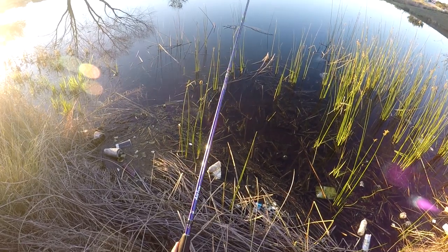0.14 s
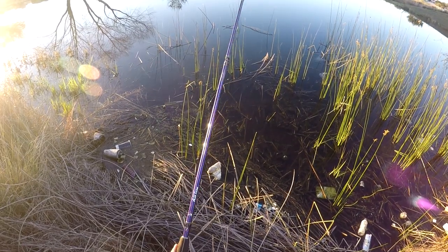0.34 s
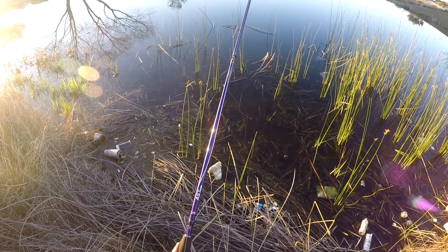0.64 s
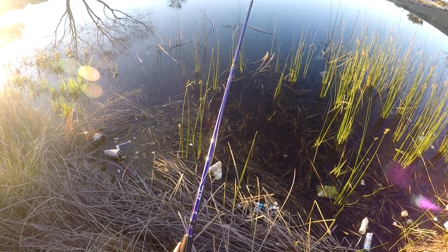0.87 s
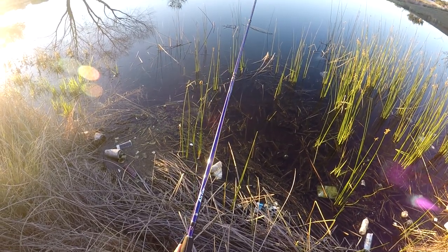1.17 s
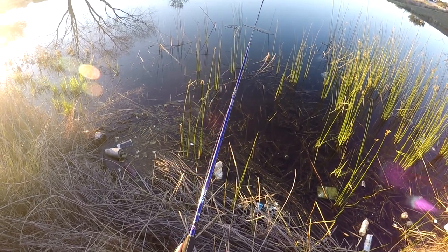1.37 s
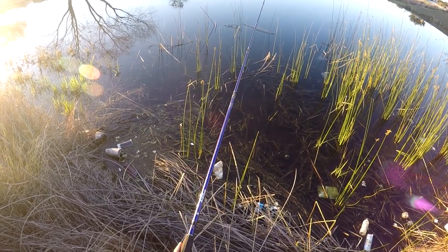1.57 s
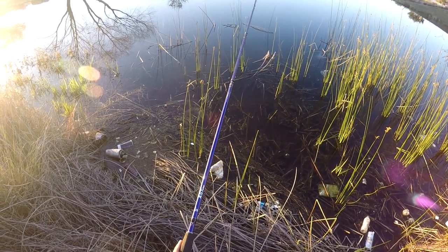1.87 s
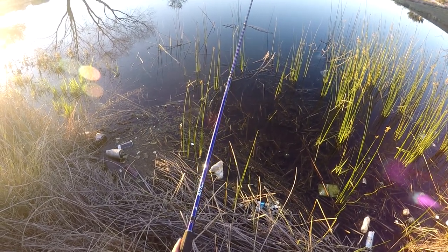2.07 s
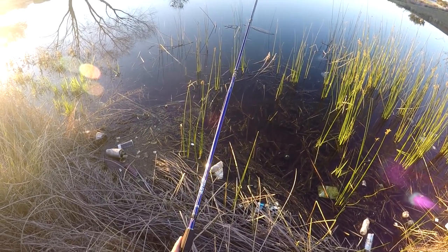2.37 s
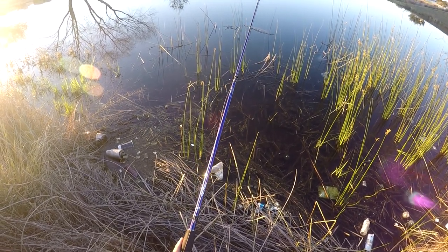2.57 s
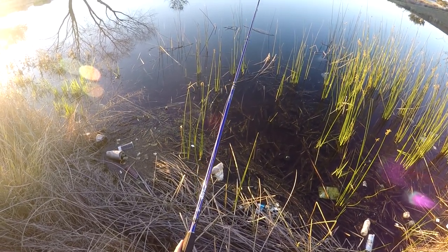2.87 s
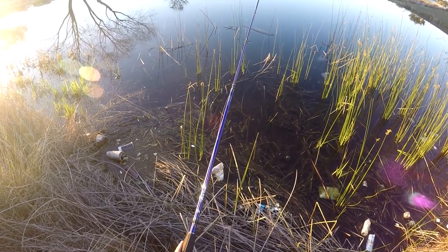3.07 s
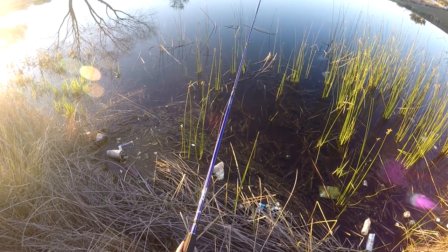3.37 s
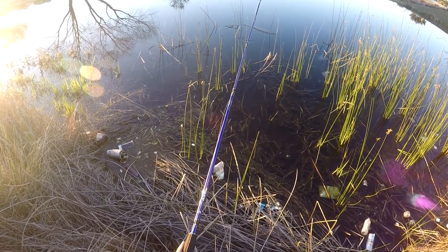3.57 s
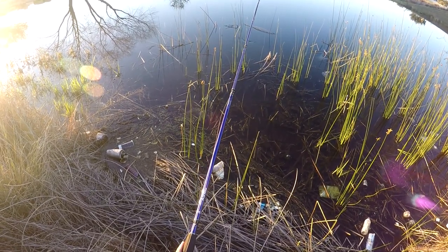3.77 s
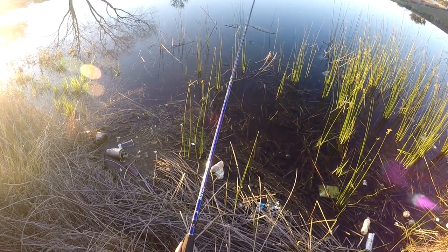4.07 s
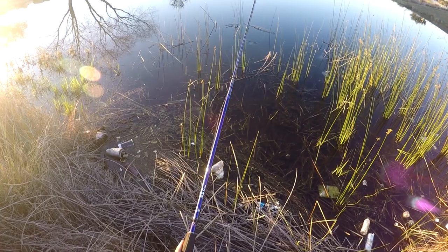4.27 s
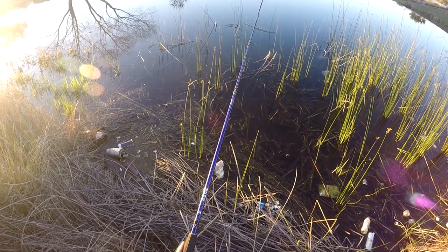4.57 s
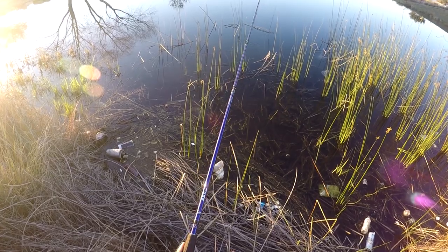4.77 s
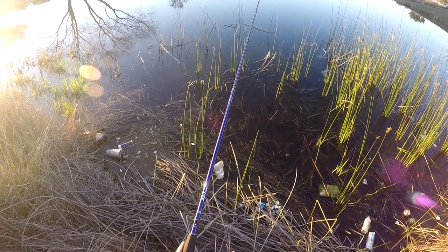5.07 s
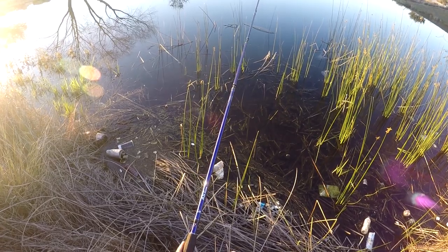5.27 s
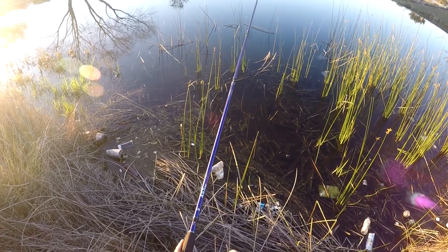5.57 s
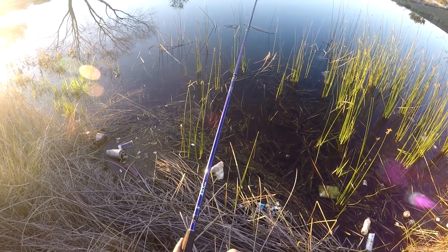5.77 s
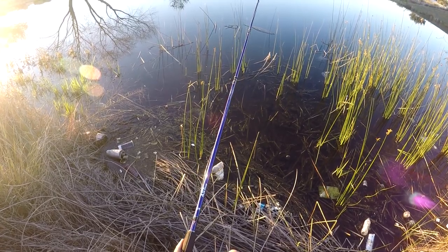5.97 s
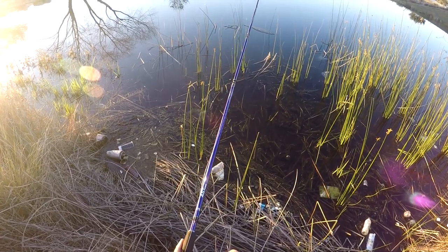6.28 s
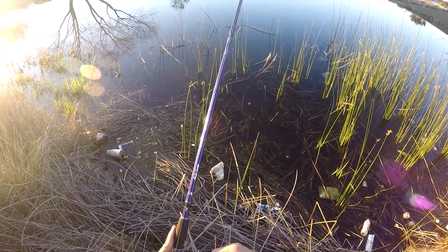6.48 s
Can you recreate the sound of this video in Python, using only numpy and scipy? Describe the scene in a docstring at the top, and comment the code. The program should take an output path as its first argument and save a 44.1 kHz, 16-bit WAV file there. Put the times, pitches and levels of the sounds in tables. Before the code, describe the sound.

Distant traffic rumbles steadily, heard from the edge of a pond in a city park. Muffled exhausts surge and die away, and far engines hum over a soft wash of tyres. About halfway through, one closer engine comes in with a firm low drone, rises a little in pitch, then eases off. Right at the microphone, a camera adds a faint hiss and a thin pulsing whine.

```python
"""Distant traffic across a park pond

A deep rumble swells and sinks as vehicles pass on a far road. Exhausts roar up under throttle,
single engines drone out of the blur, one closer than the rest, and tyres make a soft wash.
Close by, a camera hisses and gives a thin pulsing whine, while a faint sizzle fades away."""
import sys
import numpy as np
from scipy import signal
from scipy.fft import rfft, irfft
from scipy.io import wavfile
from scipy.ndimage import uniform_filter1d

SR = 44100
rng = np.random.default_rng(int(sys.argv[2]) if len(sys.argv) > 2 else 0)


def transcribe(u):
    """Save the signal u as a 16-bit wav file named by the first command-line argument.

    u: samples, shape (n,) or (channels, n), limited to [-1, 1]; the rate is SR.
    q: integer samples, one column per channel.
    """
    v = np.clip(np.atleast_2d(u).T, -1, 1)
    q = np.round(v * 32767).astype(np.int16)
    wavfile.write(sys.argv[1], SR, q)


N = 292203
TIME = np.arange(N) / SR

# How strong each noise is from low to high pitch: frequency_hz, relative_db
HISS_SPECTRUM = [(4000, 0), (5100, -.7), (6000, 0), (7100, -.6), (7900, -2.3), (8900, .7), (10000, .7),
                 (11400, -4.7), (13600, -9.3), (15200, -15.5)]
SIZZLE_SPECTRUM = [(1000, -11), (2600, -3.5), (4600, -2.5), (5600, 2.5), (6800, -1), (8500, -6),
                   (13000, -45)]
TYRE_SPECTRUM = [(150, -2.5), (350, 3), (480, -0.2), (650, -1.5), (900, -5), (1100, -3), (1350, -4.5),
                 (1750, -6), (2100, -10.5), (2600, -11.5), (3300, -15.5), (4300, -15), (5200, -27.5),
                 (12000, -65)]
RUMBLE_SPECTRUM = [(3, -49), (10, -2.5), (18, -0.5), (36, 1.2), (52, -2), (75, -1.5), (100, -6.5),
                   (125, -6), (150, -14.5), (220, -24), (400, -45), (1000, -110)]
ROAR_SPECTRUM = [(70, -23), (115, -3.5), (138, -3), (165, -4.5), (198, -1.1), (222, -5.5), (255, -11.5),
                 (290, -17.5), (320, -22.5), (365, -34.5), (500, -56), (1500, -100)]
# The whine's two bursts, timed in shares of one cycle: peak_share, rise_share, fall_share
WHINE_PULSES = [(.17, .1, .04), (.675, .26, .04)]
# Thin ringing tones in the sizzle: pitch_hz, relative_db
RING_TONES = [(2550, -12), (4400, -10), (5600, -16), (6150, -13.5)]
# How loudly the tyre tread sings: time_s, level_db
TREAD_LEVELS = [(0.05, -59), (0.35, -59), (0.6, -63), (1.0, -60), (1.2, -66), (1.9, -63), (2.3, -59.5),
                (2.8, -63), (3.15, -65), (3.6, -63), (4.0, -73), (4.6, -64.5), (5.2, -64), (6.35, -60.5),
                (6.63, -61.5)]
# Faint rubs in the tyre wash: peak_s, centre_hz, width_hz, level_db, length_s
SOFT_RUBS = [(0.146, 676, 150, -57.5, 0.1), (0.24, 2600, 220, -63.5, 0.16), (0.345, 1630, 120, -58, 0.07),
             (0.57, 1000, 70, -59, 0.07), (2.42, 1170, 70, -60, 0.08), (3.287, 1380, 150, -58, 0.051),
             (6.015, 2447, 219.5, -63, 0.06)]
# Exhausts under throttle: peak_s, level_db, rise_s, fall_s (time to sink to 37%)
THROTTLE_SURGES = [(0.18, -32, 0.27, 0.39), (2.0, -34.5, 0.17, 0.42), (2.68, -36, 0.15, 0.075),
                   (3.25, -35, 0.053, 1), (4.35, -36.5, 0.19, 0.18), (4.72, -41, 0.08, 0.44)]
# Heavy vehicles going by: nearest_s, rumble_db, half_power_s, exhaust_hz, exhaust_db
HEAVY_VEHICLES = [(0.35, -26, 1.07, 77.47, -34.5), (3.65, -26, 0.44, 139.2, -40),
                  (4.4, -33, 0.34, 75.47, -39.5), (4.85, -32.5, 0.32, 140.1, -35.5),
                  (5.5, -33.5, 0.45, 72.34, -40)]
# Brief booms above the roar: peak_s, pitch_hz, level_db, length_s
LOW_BOOMS = [(0.196, 206, -39, 0.72), (0.707, 199, -42.5, 0.54), (1.93, 192, -36.5, 0.22),
             (2.143, 201, -40, 0.24), (2.627, 203, -33.5, 0.29), (3.275, 145, -31, 0.12),
             (3.666, 192, -43, 0.49), (4.049, 203, -39.5, 0.21), (4.76, 190, -37, 0.18),
             (4.98, 213, -39, 0.26)]
# Engines farther off: start_s, length_s, pitch_hz, glide_hz_per_s, level_db, change_db_per_s
FAR_DRONES = [(-0.1, 2.45, 241.2, -2.5, -47.5, 0), (2.536, 1.73, 231.5, -2.5, -50.5, 0),
              (-0.1, 4.4, 291.3, -0.16, -53.5, -2.5), (4.245, 0.71, 73.7, 4, -33.5, 0),
              (4.907, 1.5, 173.6, -1.4, -48, 1.5), (5.433, 0.46, 203.5, 0, -47, 6)]
# The nearest engine cruises, speeds up, then eases off: time_s, pitch_hz, level_db
NEAR_DRONE = [(2.7, 111.5, -39.5), (2.85, 111.5, -32), (3.3, 106.1, -29.5), (3.55, 107.1, -31.5),
              (3.75, 108.5, -27.5), (4.05, 106.9, -32), (4.3, 107.5, -36), (4.578, 112.8, -28.5),
              (4.751, 125.1, -35.5), (5.08, 124.5, -31), (5.249, 122.9, -42.5), (5.7, 122.5, -37),
              (6.1, 127, -42.5), (6.63, 121, -37)]

DRONE_FADE_S = 0.027


def gain_of(db):
    """Turns decibels into a number to multiply a sound by."""
    return 10 ** (np.asarray(db) / 20)


def unit_level(sound):
    """Scales a sound to an average power of one."""
    return sound / np.sqrt(np.mean(sound ** 2) + 1e-20)


def ramp(start_s, length_s):
    """Climbs from zero to one, then stays there."""
    return np.clip((TIME - start_s) / length_s, 0, 1)


def arch(peak_s, length_s):
    """Swells from zero to one and sinks back, all within length_s."""
    return np.cos(np.pi * np.clip((TIME - peak_s) / length_s, -.5, .5))


def noise(spectrum):
    """Noise with its lows and highs shaped by a spectrum table."""
    hz = np.fft.rfftfreq(N, 1 / SR)
    points_hz, points_db = np.transpose(spectrum)
    shape = gain_of(np.interp(np.log(hz + 1), np.log(points_hz), points_db))
    return unit_level(irfft(rfft(rng.standard_normal(N)) * shape, N))


def drift(rate_hz):
    """A random wobble that moves up to about rate_hz times a second."""
    hz = np.fft.rfftfreq(N, 1 / SR)
    shape = np.exp(-.5 * (hz / rate_hz) ** 2)
    return unit_level(irfft(rfft(rng.standard_normal(N)) * shape, N))


def noise_band(centre_hz, width_hz):
    """Noise around one pitch: the narrower, the more like a tone."""
    angle = 2 * np.pi * centre_hz * TIME
    return unit_level(drift(width_hz) * np.cos(angle) + drift(width_hz) * np.sin(angle))


def steadied(sound, samples):
    """Keeps quick flutter but evens out swells longer than this many samples."""
    local_power = uniform_filter1d(uniform_filter1d(sound ** 2, samples), samples)
    return sound / np.sqrt(local_power + 1e-12)


def camera(pictures_per_s=29.97):
    """A camera hisses steadily, and its high whine pulses twice for each picture."""
    cycle = (TIME * pictures_per_s) % 1
    power = sum(np.interp(cycle, [peak - rise, peak, peak + fall], [0, 1, 0])
                for peak, rise, fall in WHINE_PULSES)
    pulsing = np.sqrt(power + gain_of(-10) ** 2)  # the whine never quite stops
    tone = steadied(noise_band(8570, width_hz=74), samples=330)
    flicker = gain_of(1.4 * drift(rate_hz=13))
    whine = gain_of(-68) * unit_level(pulsing * tone * flicker)
    return whine + gain_of(-61) * noise(HISS_SPECTRUM)


def sizzle(start_db=-63.5, drop_db=2.3, fade_db_per_s=3.5):
    """A faint high rustle dips, then keeps fading; its thin rings mostly stop at the dip."""
    dropped = ramp(start_s=0.48, length_s=0.08)
    rings = sum(gain_of(db) * noise_band(hz, width_hz=48) for hz, db in RING_TONES)
    rustle = noise(SIZZLE_SPECTRUM) + gain_of(-12 * dropped) * rings
    level_db = start_db - drop_db * dropped - fade_db_per_s * TIME
    flicker_db = 1.4 * drift(rate_hz=25)
    return rustle * gain_of(level_db + flicker_db)


def tyres(start_db=-52.5, fade_db_per_s=0.2172):
    """Rolling tyres make a broad wash and their tread sings; the air stirs both a little."""
    power = gain_of(start_db - fade_db_per_s * TIME) ** 2
    power += gain_of(-26) ** 2 * surge_power()  # a little of each exhaust surge reaches the wash
    tread_db = np.interp(TIME, *np.transpose(TREAD_LEVELS))
    tread = noise_band(1526, width_hz=150) * gain_of(tread_db + drift(rate_hz=7.5))
    wash = np.sqrt(power) * noise(TYRE_SPECTRUM)
    return (wash + tread) * gain_of(0.19 * drift(rate_hz=7.8))


def scuffs():
    """Short soft rubs stand out of the wash, each around one pitch."""
    return sum(gain_of(db) * arch(peak_s, length_s) * steadied(noise_band(hz, width_hz), samples=800)
               for peak_s, hz, width_hz, db, length_s in SOFT_RUBS)


def surge_power():
    """The power of exhausts that roar up under throttle and die away."""
    power = np.zeros(N)
    for peak_s, db, rise_s, fall_s in THROTTLE_SURGES:
        dying = np.exp(-np.maximum(TIME - peak_s, 0) / fall_s)
        power += (gain_of(db) * ramp(peak_s - rise_s, rise_s) * dying) ** 2
    return power


def traffic(steady_rumble_db=-34, steady_roar_db=-40.5):
    """Many engines blur together, adding in power; distance leaves little above 300 Hz."""
    rumble_power = gain_of(steady_rumble_db) ** 2
    exhausts = np.zeros(N)
    for nearest_s, rumble_db, half_power_s, exhaust_hz, exhaust_db in HEAVY_VEHICLES:
        nearness = 1 / np.hypot(1, (TIME - nearest_s) / half_power_s)  # twice as far, half as strong
        rumble_power += (gain_of(rumble_db) * nearness) ** 2
        pipe_hum = steadied(noise_band(exhaust_hz, width_hz=0.17 * exhaust_hz), samples=5000)
        exhausts += gain_of(exhaust_db) * nearness * pipe_hum
    rumble = np.sqrt(rumble_power) * steadied(noise(RUMBLE_SPECTRUM), samples=4000)
    roar_power = gain_of(steady_roar_db) ** 2 + surge_power()
    roar = np.sqrt(roar_power) * steadied(noise(ROAR_SPECTRUM), samples=5000)
    return rumble + roar + exhausts


def engine_tone(pitch_hz, waver):
    """Only one tone of an engine's firing carries this far; moving air makes it waver."""
    turns = np.cumsum(pitch_hz) / SR
    tone = np.sin(2 * np.pi * turns + waver * drift(rate_hz=6.7))
    flutter = 1 + waver * drift(rate_hz=23)
    return unit_level(tone * flutter)


def far_engines():
    """Each far engine drones for a while at an almost even speed."""
    drones = np.zeros(N)
    for start_s, length_s, hz, glide_hz_per_s, db, change_db_per_s in FAR_DRONES:
        age_s = np.clip(TIME - start_s, 0, length_s)
        heard = ramp(start_s, DRONE_FADE_S) - ramp(start_s + length_s, DRONE_FADE_S)
        tone = engine_tone(hz + glide_hz_per_s * age_s, waver=0.23)
        drones += heard * gain_of(db + change_db_per_s * age_s) * tone
    return drones


def booms():
    """Low wavering tones swell out of the traffic and sink back."""
    return sum(gain_of(db) * arch(peak_s, length_s) * engine_tone(np.full(N, hz), waver=0.69)
               for peak_s, hz, db, length_s in LOW_BOOMS)


def near_engine():
    """One vehicle passes closer than the rest, with a firm drone that follows its speed."""
    time_s, pitch_hz, level_db = np.transpose(NEAR_DRONE)
    tone = engine_tone(np.interp(TIME, time_s, pitch_hz), waver=0.26)
    loudness = gain_of(np.interp(TIME, time_s, level_db))
    return ramp(time_s[0], DRONE_FADE_S) * loudness * tone


def scene():
    """Adds all the sounds together in one channel."""
    background = camera() + sizzle() + tyres() + scuffs()
    engines = traffic() + far_engines() + booms() + near_engine()
    return (background + engines)[None]


def record(dry, fade_s=0.003, cutoff_hz=15250):
    """Softens the start and end, and cuts off the very highest treble."""
    faded = dry * ramp(0, fade_s) * (1 - ramp(TIME[-1] - fade_s, fade_s))
    low_pass = signal.firwin(1023, cutoff_hz, window=("kaiser", 9), fs=SR)
    return signal.oaconvolve(faded, low_pass[None], "same")


dry = scene()
out = record(dry)
transcribe(out)
```